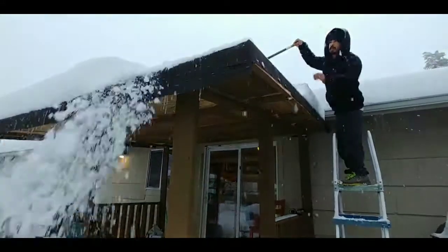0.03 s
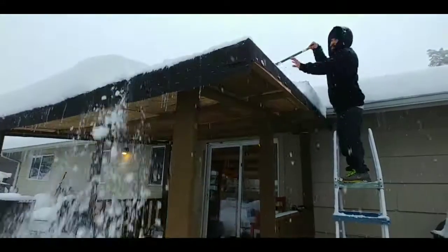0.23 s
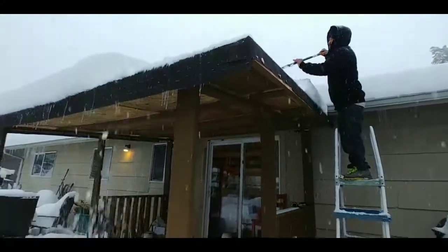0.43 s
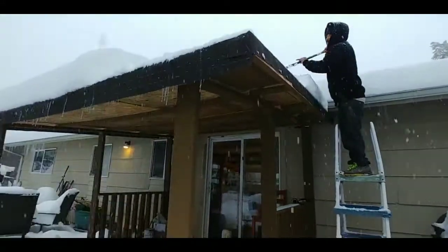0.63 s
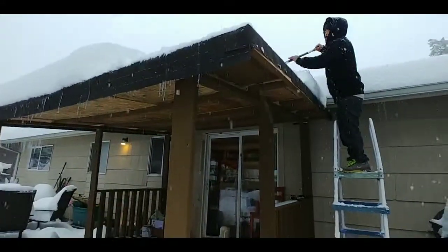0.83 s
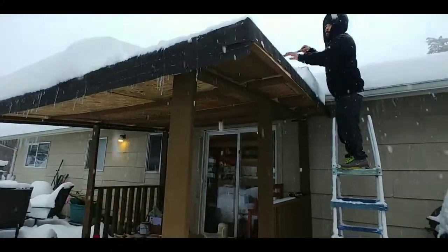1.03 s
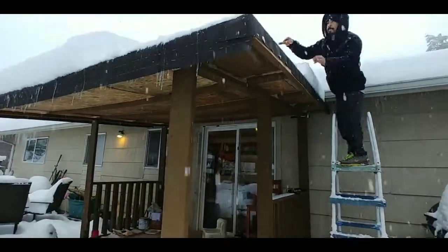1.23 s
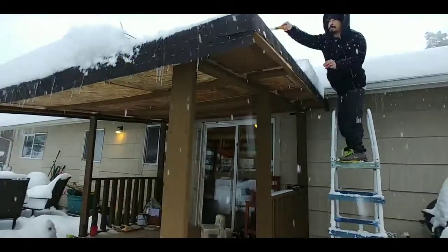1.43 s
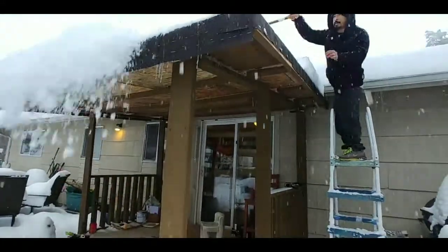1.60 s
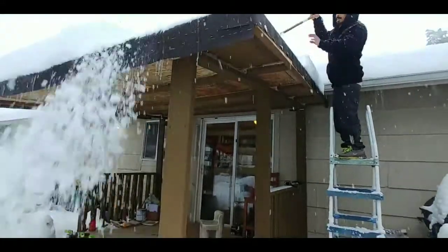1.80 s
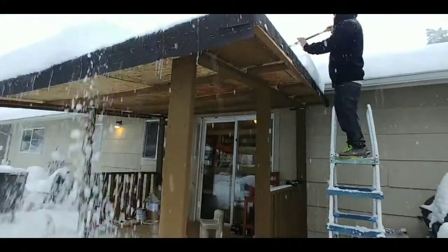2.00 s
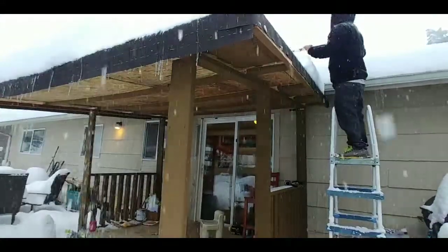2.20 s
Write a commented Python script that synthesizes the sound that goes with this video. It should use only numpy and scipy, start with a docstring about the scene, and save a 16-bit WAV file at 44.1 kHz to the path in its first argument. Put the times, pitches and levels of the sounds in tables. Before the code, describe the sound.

Snow scraped off a roof with a rake, crunching and falling in dull thuds outdoors.

```python
"""A faint hiss, a soft thud and a knock, then light scraping: a long rake clears snow from a porch roof.
The blade breaks packed grains, the hollow pole slides out with a hiss of friction, and after a long push
the crust crunches twice. Clumps spill over the edge and land with dull thuds and a patter; the pole
squeaks once in the grip. The eaves scatter the rake's sound on its way to a phone a few metres off."""
import sys
import numpy as np
from scipy import signal
from scipy.fft import rfft, irfft
from scipy.io import wavfile
from scipy.ndimage import map_coordinates

SR = 44100
rng = np.random.default_rng(int(sys.argv[2]) if len(sys.argv) > 2 else 0)


def transcribe(signal):
    """Save signal, clipped to [-1, 1], as a 16-bit WAV file at the path in sys.argv[1]."""
    frames = np.atleast_2d(signal).T
    limited = np.clip(frames, -1, 1)
    pcm = np.round(limited * 32767).astype(np.int16)
    wavfile.write(sys.argv[1], SR, pcm)


N = 103635

# blows of the blade on the roof: t/s, peak level/dB, relative ring level/dB
KNOCKS = [(0.111, -33.5, -46), (0.178, -31.5, -61), (0.322, -25.5, -45), (0.863, -21.5, -35),
          (0.871, -26, -24.5), (1.468, -23.5, -34), (1.66, -25, -28.5)]


def undb(db):
    """Amplitude ratio of a level: a factor of ten per 20 dB."""
    return 10 ** (np.asarray(db) / 20)


def unit(x):
    """Normalisation to an rms of 1."""
    return x / np.sqrt(np.mean(x ** 2))


def clock():
    """Uniform sampling: t/s of each sample."""
    return np.arange(N) / SR


def curve(rows, column=1):
    """Linear interpolation of one table column over time."""
    rows = np.array(rows, float)
    return np.interp(clock(), rows[:, 0], rows[:, column])


def lowpass(x, hz, order=1):
    """Butterworth low-pass: 6 dB per octave and order above the cutoff."""
    return signal.sosfilt(signal.butter(order, hz, fs=SR, output="sos"), x)


def colour(x, spectrum, size=4096):
    """Minimum-phase filter through points of f/Hz, gain/dB; folding the cepstrum makes it causal."""
    hz, db = np.array(spectrum, float).T
    f = np.maximum(np.fft.rfftfreq(size, 1 / SR), 1)
    gain = undb(np.interp(np.log(f), np.log(hz), db))
    cepstrum = irfft(np.log(gain))
    cepstrum[1:size // 2] *= 2
    cepstrum[size // 2 + 1:] = 0
    response = irfft(np.exp(rfft(cepstrum)))
    return signal.fftconvolve(x, response)[:len(x)]


def wander(hz):
    """Band-limited random fluctuation of rms 1."""
    return unit(lowpass(rng.standard_normal(N), hz, order=2))


def grains(per_s, spread_db, rub):
    """Shot noise: random clicks of uneven size over a smooth rub."""
    hit = rng.random(N) < per_s / SR
    size = undb(spread_db * np.clip(rng.standard_normal(N), -2, 2))
    polarity = np.sign(rng.standard_normal(N))
    return unit(hit * size * polarity) + rub * rng.standard_normal(N)


def collapses(per_s=320, fall_s=0.0039):
    """Relaxation: small collapses start at random moments and decay exponentially."""
    starts = (rng.random(N) < per_s / SR) * (1 + rng.random(N))
    load = signal.lfilter([1], [1, -np.exp(-1 / (fall_s * SR))], starts)
    return np.minimum(unit(load - load.mean()), 2)


def granular(strokes, spectrum, per_s, spread_db, rub, judder_db, gain_db):
    """Granular fracture: snow breaks in fits and starts; each stroke has its own level and tilt curves."""
    tilt_hz, fade_s = 1600, 0.006
    breaking = grains(per_s, spread_db, rub) * undb(judder_db * collapses())
    snow = unit(colour(breaking, spectrum))
    dull = lowpass(snow, tilt_hz)
    t, out = clock(), 0
    for rows in strokes:
        outside_s = t - np.clip(t, rows[0][0], rows[-1][0])
        envelope = undb(curve(rows) + gain_db) * np.exp(-(outside_s / fade_s) ** 2)
        tilt = undb(curve(rows, column=2))
        out += envelope * (dull / tilt + (snow - dull) * tilt)
    return out


def impacts(rows, spectrum, fall_s, crumble):
    """Impulse excitation: each sharp contact has a decaying tail of crumbling noise."""
    t, out = clock()[:N // 10], np.zeros(N)
    for onset_s, db, *_ in rows:
        force = crumble * rng.standard_normal(len(t)) * np.exp(-t / fall_s)
        force[0] = 1
        hit, i = colour(force, spectrum), int(onset_s * SR)
        out[i:i + len(hit)] += (undb(db) * hit / np.abs(hit).max())[:N - i]
    return out


def diffuse(spectrum, width):
    """Partly coherent noise field: width scales the part that differs between left and right."""
    mid, side = (unit(colour(rng.standard_normal(N), spectrum)) for _ in range(2))
    return mid + width * side * np.array([[1], [-1]])


def yard():
    """Stationary diffuse noise: the quiet background of the yard."""
    # outdoor air: f/Hz, relative level/dB
    spectrum = [(25, 8), (60, -11), (130, -1), (300, -12), (600, -12.5), (880, -6.5), (1100, -17),
                (2000, -7.5), (3500, -29.5), (5400, -22.5), (6300, -40), (8000, -35.5), (12000, -39)]
    return undb(-58.5) * diffuse(spectrum, width=0.59)


def pole():
    """Forced resonance: fine friction on the roof edge excites the hollow pole."""
    # strength of the sliding: t/s, level/dB
    slide = [(0, -59), (0.08, -59.5), (0.36, -65), (0.45, -43), (0.6, -38), (0.72, -38), (0.8, -39.5),
             (0.85, -45.5), (0.9, -100)]
    # resonances of the pole: f/Hz, relative level/dB
    spectrum = [(150, -27), (350, -13.5), (950, -15.5), (1350, -13), (1600, -3), (1750, 4), (1900, -3.5),
                (2300, -14), (2700, -10.5), (3020, -9), (3450, -13.5), (4100, -38), (5500, -30.5),
                (6300, -44), (12000, -64)]
    friction = grains(per_s=5000, spread_db=2.5, rub=1.0) * undb(0.5 * wander(78))
    return unit(colour(friction, spectrum)) * undb(curve(slide))


def flowing_snow():
    """Granular flow radiates diffuse noise: the mass rumbles and its powder hisses."""
    # snow in motion: t/s, relative rumble level/dB, relative powder level/dB
    flow = [(0, -88, -77), (0.07, -55, -78), (0.12, -48.5, -86), (0.35, -55.5, -75), (0.55, -49.5, -62),
            (0.8, -57.5, -61), (1.05, -48, -57), (1.45, -56, -63), (1.8, -49, -56.5), (2.05, -44.5, -59),
            (2.2, -49.5, -63.5), (2.35, -57.5, -75.5)]
    # spectra of mass and powder: f/Hz, relative level/dB
    rumble_spectrum = [(20, -15), (35, -3.5), (52, -7), (75, -8.5), (125, -4.5), (220, -14), (450, -29.5),
                       (1500, -86)]
    powder_spectrum = [(1000, -20), (2500, 6), (5400, 1), (6300, -11), (8000, -7), (10000, -7.5),
                       (12000, -17)]
    rumble = diffuse(rumble_spectrum, width=0.54) * undb(curve(flow))
    powder = diffuse(powder_spectrum, width=0.98) * undb(curve(flow, column=2) + 1.6 * wander(150))
    return rumble + powder


def thuds(rise_s=0.011, fall_s=0.017, grit=0.29):
    """Inelastic impact: a soft, heavy clump gives a few damped low cycles with a rough edge."""
    # clumps hit the ground: t/s, relative level/dB, f/Hz
    landings = [(0.086, -42.5, 117.5), (0.243, -35, 58.6), (0.311, -31, 61), (0.386, -33.5, 58),
                (0.438, -36, 60.5), (0.606, -37, 60.3), (0.632, -40, 62), (1.012, -45.5, 108),
                (1.932, -37.5, 54.7), (1.954, -34.5, 63), (2.011, -32, 54.4), (2.047, -40, 51.7),
                (2.081, -35.5, 56.4), (2.175, -37, 85.6), (2.198, -42.5, 117)]
    out = 0
    for onset_s, db, hz in landings:
        age = np.maximum(clock() - onset_s, 0)
        envelope = (1 - np.exp(-age / rise_s)) * np.exp(-age / fall_s)
        wave = np.sin(2 * np.pi * hz * age) + grit * wander(86)
        out += 0.77 * undb(db) * envelope / envelope.max() * wave
    return out


def knocks():
    """Contact transients: the blade strikes the roof."""
    # blade against roof: f/Hz, relative level/dB
    spectrum = [(100, -28.5), (400, -7.5), (750, -1), (1030, -1), (1250, -0.5), (1500, 7.5), (2000, -9.5),
                (2700, -7), (4000, -27), (12000, -60)]
    return impacts(KNOCKS, spectrum, fall_s=0.0054, crumble=0.23)


def blade_ring():
    """Free vibration: after each knock the blade's modes, slightly detuned, decay exponentially."""
    # modes of the blade: f/Hz, relative level/dB, T60/s
    modes = [(347, -15, 0.038), (1003, -5, 0.11), (1295, -6, 0.036)]
    out = 0
    for onset_s, _, ring_db in KNOCKS:
        age = np.maximum(clock() - onset_s, 0)
        for hz, db, t60 in modes:
            detuned_hz = hz * (1 + 0.004 * rng.standard_normal())
            out += undb(ring_db + db - 60 * age / t60) * np.sin(2 * np.pi * detuned_hz * age)
    return out


def scrapes(per_s=3500):
    """Shear breaks packed grains: two light scrapes, a long push and the spill over the edge."""
    # strokes of the blade: t/s, relative level/dB, tilt/dB
    light_strokes = [
        [(0.14, -47.5, -1), (0.174, -47.5, 10.5), (0.178, -49, 2.5), (0.215, -37, -2), (0.27, -36.5, 0.5),
         (0.332, -35.5, 3.5), (0.368, -38.5, -0.5), (0.395, -35.5, 3.5), (0.425, -51, -8)],
        [(0.735, -42, 5), (0.745, -37.5, -3.5), (0.775, -38.5, -3), (0.8, -35, -2.5), (0.82, -39.5, -3),
         (0.842, -49, -12.5)],
    ]
    push = [(0.86, -47.5, -14), (0.892, -35, 0), (0.92, -32.5, -6.5), (0.96, -28, 0.5), (1.01, -27, 0.5),
            (1.06, -31, -1), (1.14, -30, 1), (1.25, -33, 1), (1.34, -29.5, -0.5)]
    spill = [(1.598, -51.5, -4), (1.62, -39.5, -2), (1.657, -41, -6.5), (1.661, -30, 3), (1.695, -35.5, -5),
             (1.715, -28.5, 2.5), (1.74, -36, -4.5), (1.755, -25, 1), (1.774, -35.5, -1),
             (1.809, -30, -1.5), (1.815, -26, 3), (1.889, -28, -4), (1.94, -40, -3.5)]
    # light and heavy scraping: f/Hz, relative level/dB
    light_spectrum = [(190, -27), (300, -5.5), (430, -3.5), (530, -5), (700, -6), (830, 1.5), (1000, -3),
                      (1300, -5), (1550, 1.5), (1900, -7), (2250, -0.5), (2700, -9), (3900, -16),
                      (4800, -39), (5500, -26), (6300, -44.5), (12000, -53.5)]
    heavy_spectrum = [(60, -37), (170, -4), (240, -7.5), (300, -1.5), (550, -5.5), (750, -1), (1550, -1.5),
                      (1900, -2), (2400, -3), (3500, -9), (4800, -21), (5500, -21.5), (6300, -37),
                      (7800, -32), (10000, -45.5), (12000, -80)]
    light = granular(light_strokes, light_spectrum, per_s,
                     spread_db=2.0, rub=0.43, judder_db=1.5, gain_db=-1.27)
    heavy = granular([push, spill], heavy_spectrum, per_s,
                     spread_db=4.5, rub=0.54, judder_db=1.0, gain_db=-0.26)
    return light + heavy


def cracks():
    """Brittle fracture: each single crack of the crust is almost a pure impulse."""
    # cracks: t/s, peak level/dB
    snaps = [(0.225, -25.5), (0.27, -24.5), (0.331, -28), (0.949, -12.5), (1.0, -16), (1.366, -8.5),
             (1.378, -25), (1.486, -19), (1.509, -24), (1.5166, -7), (1.5225, -10), (1.883, -24)]
    # snapping crust: f/Hz, relative level/dB
    spectrum = [(100, -25.5), (400, -2), (800, -12.5), (1500, -7), (2300, 0.5), (3000, -7.5), (4000, -12),
                (5400, -35), (6300, -41), (7700, -34), (11500, -54)]
    return impacts(snaps, spectrum, fall_s=0.00075, crumble=0.019)


def ice_ticks():
    """Short contacts radiate treble: ice pellets tick close by."""
    # pellet strikes: t/s, peak level/dB
    strikes = [(0.782, -39), (1.109, -44), (1.823, -31), (2.022, -38)]
    # one pellet: f/Hz, relative level/dB
    spectrum = [(1000, -26), (3200, 5), (4500, 6), (5600, 11), (6400, -12), (8300, -5.5), (12000, -25.5)]
    return impacts(strikes, spectrum, fall_s=0.0011, crumble=0.2)


def crunches():
    """Dense fractures merge into a crunch as the crust gives way, twice."""
    # the crust, break by break: t/s, relative level/dB, tilt/dB
    breaks = [
        [(1.345, -32, -1.5), (1.351, -29, 5.5), (1.368, -25, 0.5), (1.381, -29.5, -2), (1.391, -36.5, -7),
         (1.42, -47, 1), (1.445, -58, -8)],
        [(1.478, -41, 3), (1.481, -28, -1), (1.5, -26.5, -2.5), (1.518, -26, 2), (1.535, -29, 1.5),
         (1.556, -30, 3), (1.575, -34, -3.5), (1.6, -49, -8)],
    ]
    # crushed crust: f/Hz, relative level/dB
    spectrum = [(80, -45), (230, -21), (330, -8), (520, -9), (780, -1.5), (1200, -4.5), (1600, 0.5),
                (2300, -5.5), (2900, -11), (3500, -12), (4100, -31), (4600, -16), (5500, -20.5),
                (6300, -40), (7700, -33), (11500, -38.5)]
    return granular(breaks, spectrum, per_s=2500, spread_db=4.5, rub=0.43, judder_db=0.8, gain_db=2.5)


def patter():
    """Superposition of many small impacts: loose snow lands."""
    # the shower of snow: t/s, relative level/dB, tilt/dB
    shower = [(1.93, -39, -0.5), (1.96, -38, -3), (1.99, -44.5, -4), (2.02, -42.5, -1), (2.05, -35, 2.5),
              (2.08, -42, 0), (2.108, -46.5, 5.5), (2.168, -40.5, 0), (2.205, -58, -6.5), (2.26, -71, 8)]
    # soft landings: f/Hz, relative level/dB
    spectrum = [(70, -11), (160, -1), (850, 1), (1200, -3), (1700, -2), (2300, -7.5), (3300, -27),
                (5400, -26), (6300, -49), (12000, -43)]
    return granular([shower], spectrum, per_s=1400, spread_db=4.5, rub=0.5, judder_db=0.5, gain_db=-0.8)


def squeak():
    """Friction tone: the pole gives one short, slightly unsteady chirp in the grip."""
    # the chirp: t/s, peak level/dB, f/Hz, half length/s
    chirp = (2.333, -47, 1920, 0.005)
    centre_s, db, hz, half_s = chirp
    phase = 2 * np.pi * np.cumsum(hz * (1 + 0.017 * wander(180))) / SR
    return undb(db) * np.exp(-((clock() - centre_s) / half_s) ** 2) * np.sin(phase)


def ports(x, lead_ms, pan_db, shadow_hz):
    """Path difference and shadowing: the left port leads by lead_ms, and by pan_db above shadow_hz."""
    low = lowpass(x, shadow_hz)
    left = low + (x - low) * undb(pan_db / 2)
    right = low + (x - low) * undb(-pan_db / 2)
    delayed = np.arange(N) - lead_ms * SR / 1000
    return np.array([left, map_coordinates(right, [delayed], mode="nearest")])


def eaves(x, rise_s=0.0001, fall_s=0.0062, low_hz=716, hop=1024):
    """Scattering: eaves and wall return the treble, in a new echo pattern for every patch of snow."""
    t = clock()[:2 * hop]
    decay = np.exp(-t / fall_s) * (1 - np.exp(-t / rise_s))
    window = np.sin(np.linspace(0, np.pi, 2 * hop))
    treble = np.pad(x - lowpass(x, low_hz), ((0, 0), (0, 4 * hop)))
    out = np.zeros(treble.shape)
    for i in range(0, N, hop):
        echoes = rng.standard_normal((2, len(t))) * decay / np.linalg.norm(decay)
        reflected = signal.fftconvolve(treble[:, i:i + 2 * hop] * window, echoes, axes=1)
        out[:, i:i + reflected.shape[1]] += reflected
    return out[:, :N]


def scene():
    """Superposition of direct sound, reflections and diffuse noise at the phone's two ports."""
    # where the snow moves: t/s, lead of the left port/ms, treble level left minus right/dB
    place = [(0, 0.13, -2.5), (0.3, -0.016, 2), (0.78, 0.035, 1), (1.1, 0.025, 2), (1.3, 0.22, 4),
             (1.52, 0.27, 5), (1.68, 0.19, -2.5), (1.83, 0.016, 2), (2.18, -0.00032, 0.5)]
    raking = patter() + cracks() + knocks() + blade_ring() + ice_ticks()
    raking += scrapes() + crunches() + squeak()
    snow = ports(raking, lead_ms=curve(place), pan_db=curve(place, column=2), shadow_hz=910)
    slide = ports(pole(), lead_ms=0.0083, pan_db=-6.5, shadow_hz=300)
    clumps = ports(thuds(), lead_ms=-0.18, pan_db=-9.0, shadow_hz=22)
    return snow + slide + clumps + flowing_snow() + undb(-1) * eaves(snow + 0.5 * slide) + yard()


def record(dry):
    """Microphone response: a band-pass from 35 Hz to 11.7 kHz, the right port duller in the top treble."""
    # port responses: f/Hz, gain/dB
    left = colour(dry[0], [(1000, 0.5), (2200, -1.44), (4000, -0.7),
                           (5800, -1.8), (7500, 1.5), (12000, -2.0)])
    right = colour(dry[1], [(1000, -0.5), (2200, -0.56), (4000, 0.5),
                            (5800, -10.0), (7500, -7), (12000, -9)])
    bass_cut = signal.butter(2, 35, "high", fs=SR, output="sos")
    top_cut = signal.ellip(8, 0.2, 70, 11700, fs=SR, output="sos")
    return signal.sosfilt(top_cut, signal.sosfilt(bass_cut, np.array([left, right])))


dry = scene()
out = record(dry)
transcribe(out)
```